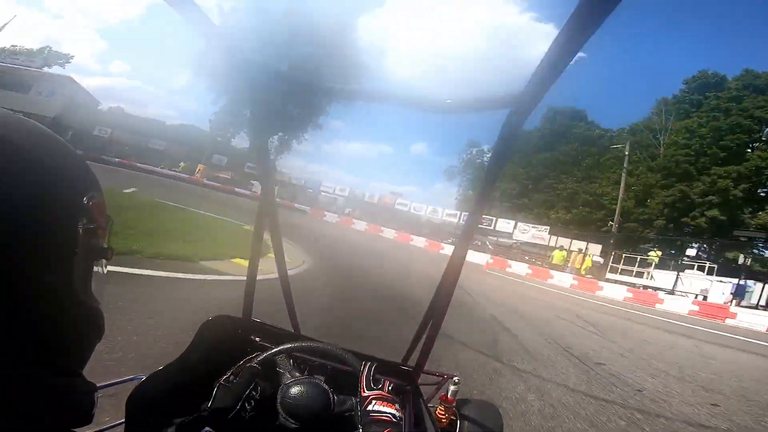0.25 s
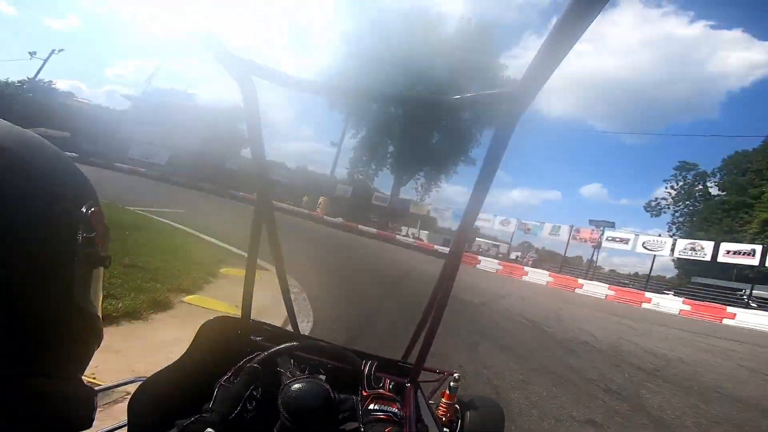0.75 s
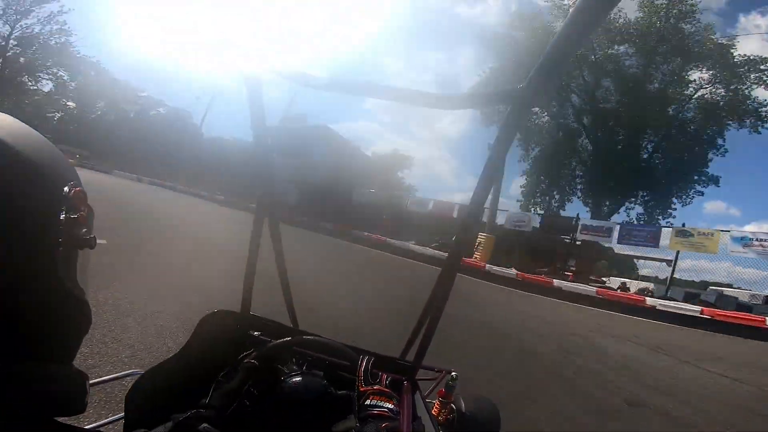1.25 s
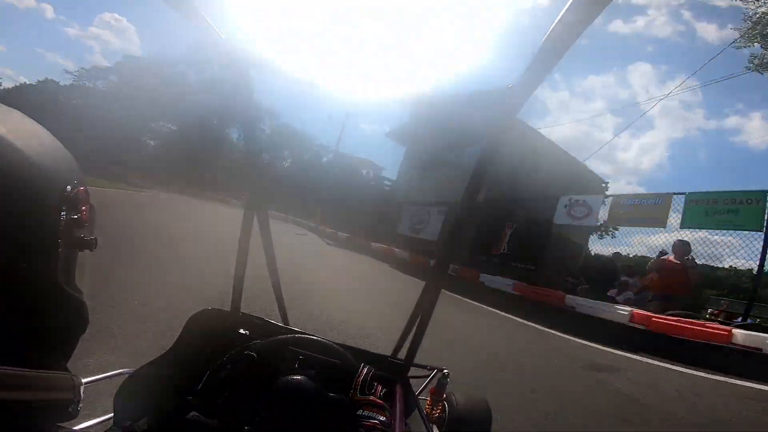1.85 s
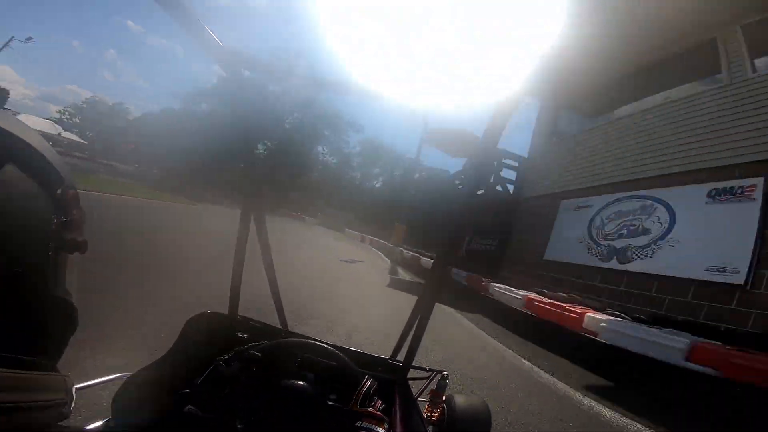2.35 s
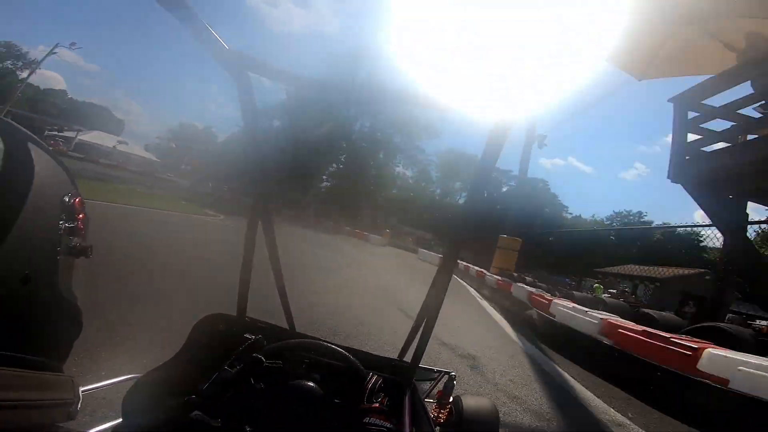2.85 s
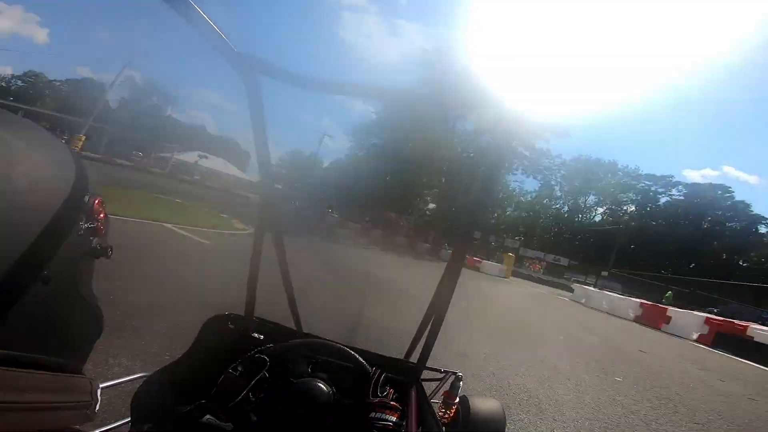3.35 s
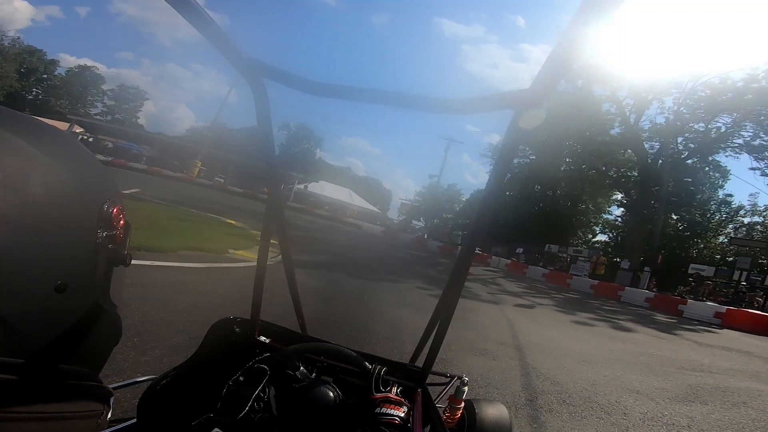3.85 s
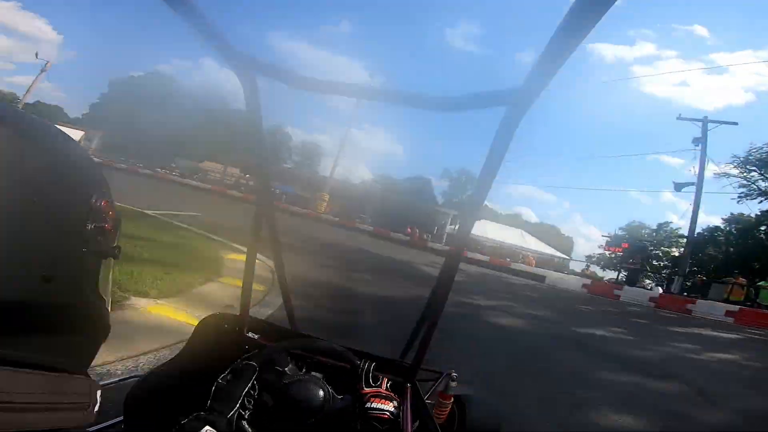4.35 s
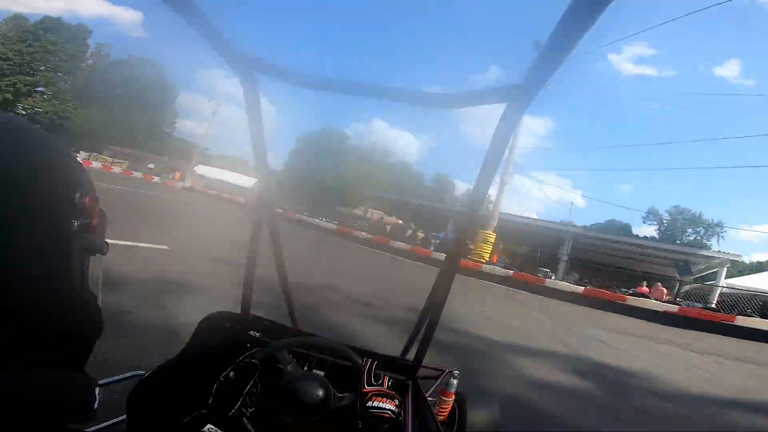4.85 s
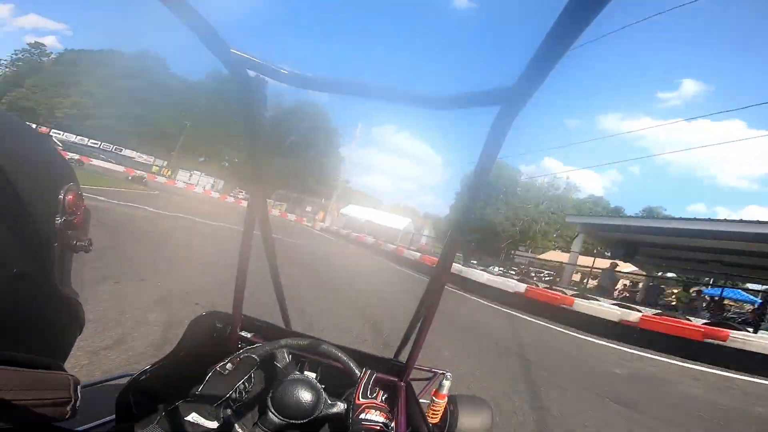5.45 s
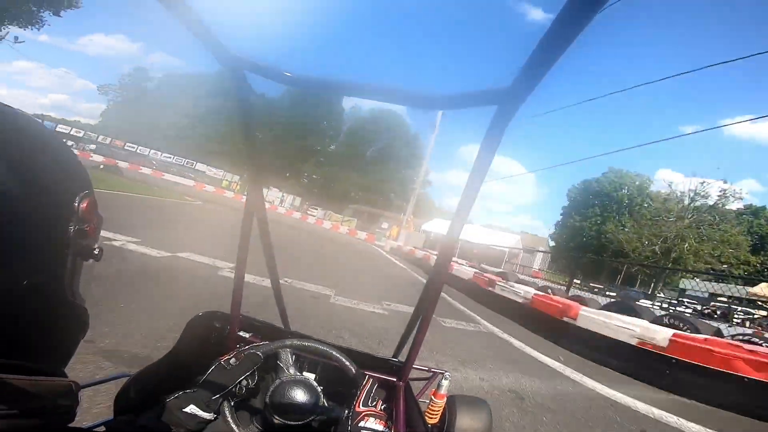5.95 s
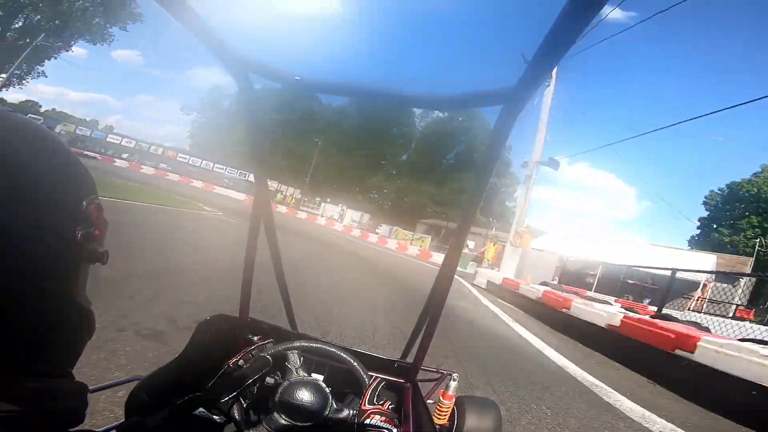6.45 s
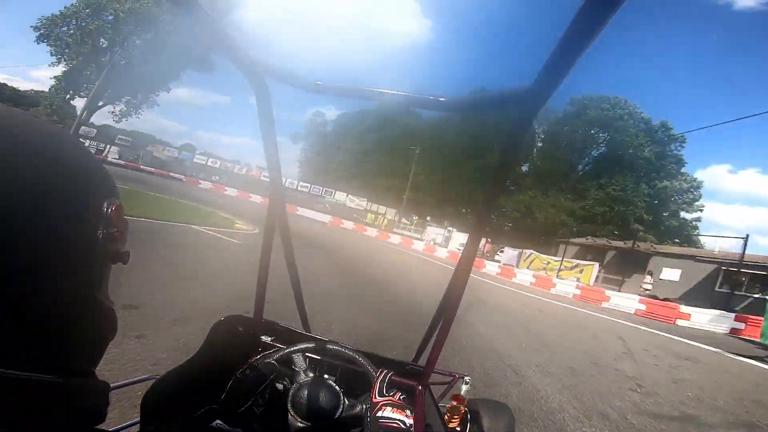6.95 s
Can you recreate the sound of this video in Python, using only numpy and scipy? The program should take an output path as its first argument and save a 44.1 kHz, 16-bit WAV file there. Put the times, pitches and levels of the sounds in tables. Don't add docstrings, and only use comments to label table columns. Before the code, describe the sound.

Loud, close, unbroken roar of a little four-stroke racing engine at full throttle, rapid metallic knocking, buzzing panels and low road and wind rumble.

```python
import sys
import numpy as np
from scipy import signal
from scipy.fft import rfft, irfft
from scipy.io import wavfile

SR = 44100
rng = np.random.default_rng(int(sys.argv[2]) if len(sys.argv) > 2 else 0)


def log_audio(samples):
    frames = np.atleast_2d(samples).T
    limited = np.clip(frames, -1, 1)
    pcm = np.round(limited * 32767).astype(np.int16)
    wavfile.write(sys.argv[1], SR, pcm)


def voltage_ratio(decibels):
    exponent = np.asarray(decibels, float) / 20
    return 10 ** exponent


N = 317961
T = np.arange(N) / SR
USUAL_HZ = 38.8


def evened(x):
    return x / np.sqrt(np.mean(x ** 2) + 1e-20)


def drift(rate_hz):
    lowpass = signal.butter(4, rate_hz, fs=SR, output="sos")
    return evened(signal.sosfilt(lowpass, rng.standard_normal(N)))


def resonate(x, hz, width_hz):
    pole = np.exp((2j * np.pi * hz - np.pi * width_hz) / SR)
    for _ in range(2):
        x = 2 * signal.lfilter([1 - abs(pole)], [1, -pole], x).real
    return x


def add(mix, start_s, sound):
    part = mix[max(round(start_s * SR), 0):][:len(sound)]
    part += sound[:len(part)]


# time_s, cycles_hz
SPEED_CURVE = [(0.0, 39.139), (0.48, 39.308), (0.96, 39.385), (1.44, 38.783), (1.92, 38.101), (2.4, 38.178),
               (2.88, 38.494), (3.36, 38.948), (3.85, 39.438), (4.33, 39.713), (4.81, 39.015),
               (5.29, 38.363), (5.77, 38.201), (6.25, 38.365), (6.73, 38.62), (7.21, 38.916)]


def engine_hz():
    time_s, cycles_hz = np.transpose(SPEED_CURVE)
    return np.interp(T, time_s, cycles_hz)


# order (x cycle rate), level_db, speed_db_per_hz, kerb_db_per_shake
STRONG_ORDERS = [(2, -14.5, -.9, -0.36), (3, -26, 0.3, 0.3), (4, -21.5, 1, 0), (7, -26, -1.5, 0.6)]
# sway_db, lag_rad (as it fails), lead_rad (just before)
WEAK_FIRING_SWAY = [
    (-1.3, 0.56, 0.14),
    (-4, 0.34, .25),
    (3.5, 0.34, 0.18),
    (4, -0.02, 0.17),
]
# order (x cycle rate), level_db
FAINT_ORDERS = [(5, -38.5), (8, -48.5), (9, -42.5), (11, -41)]


def hum(cycles):
    shake_place, shake_skew_rad = .28, 1.92
    firing_place, firing_skew_rad = .079, -.68
    fast_hz, shake = engine_hz() - USUAL_HZ, kerbs(column=2)
    orders = []
    for (order, level_db, speed_db, kerb_db), sway in zip(STRONG_ORDERS, WEAK_FIRING_SWAY):
        orders.append((round(order), level_db + speed_db * fast_hz + kerb_db * shake, *sway))
    orders += [(order, level_db, 0, 0, 0) for order, level_db in FAINT_ORDERS]
    late_cycles = .005 * drift(9)
    lost, early = stumble(.007), stumble(-.035)
    out = np.zeros(N)
    for order, level_db, sway_db, lag_rad, lead_rad in orders:
        place, skew_rad = (firing_place, firing_skew_rad) if order % 2 else (shake_place, shake_skew_rad)
        upper = order > 2
        waver_db = 0.72 * drift(2.33) * upper + (0.7 + 0.47 * upper) * drift(14.7)
        height = voltage_ratio(level_db + sway_db * lost + waver_db)
        sway_rad = -lag_rad * lost + lead_rad * early + 0.11 * drift(11)
        phase = 2 * np.pi * order * (cycles - place + late_cycles) + skew_rad + sway_rad
        out += np.sqrt(2) * height * np.cos(phase)
    return out


# first_s, count (in a row), level_db (re full knock)
FAILED_KNOCKS = [(.218, 1, -11), (.371, 1, -26), (.524, 1, -28), (.677, 2, -17), (.829, 1, -24),
                 (.982, 2, -8), (1.16, 2, -11), (1.237, 1, -4), (1.313, 1, -23), (1.52, 2, -6),
                 (1.702, 1, -5), (1.858, 1, -44), (2.408, 1, -16), (2.774, 1, -28), (2.904, 1, -46),
                 (3.394, 1, -25), (3.675, 4, -17), (3.853, 2, -19), (4.182, 3, -14), (4.308, 1, -5),
                 (4.384, 1, -25), (4.561, 1, -37), (4.715, 2, -16), (4.868, 1, -6), (5.412, 1, -11),
                 (5.595, 1, -29), (6.091, 1, -5), (6.378, 1, -6), (6.534, 1, -7), (7.103, 1, -1)]
# first_s, count (in a row), level_db (re full knock)
STRONG_REBOUNDS = [(0.053, 1, -2), (0.231, 1, -12), (0.384, 1, -3), (0.74, 1, 1), (1.096, 1, -4),
                   (1.249, 2, 0.5), (1.352, 1, -8), (1.61, 1, -3), (2.107, 1, -5), (2.448, 1, 1),
                   (2.552, 1, -6), (3.201, 1, 0.5), (3.433, 1, -0.5), (3.612, 1, -1), (3.764, 1, 2.5),
                   (4.144, 1, -2), (4.447, 1, 0.5), (4.574, 1, -4.5), (4.65, 2, -3), (4.778, 2, 0),
                   (4.88, 1, -4.0), (5.061, 1, 0.5), (5.503, 1, -3), (5.555, 1, -9), (5.974, 1, 2.5),
                   (6.104, 1, -10), (6.287, 1, -10), (6.417, 1, -2), (7.038, 1, -0.5), (7.141, 1, -3.5)]


def knock_list(cycles):
    soft_db = 1.1
    faint_db, faint_spread_db, chain_db = -18, 5, 5
    chain_cycles, chain_place = 6.54, .447
    turn = np.arange(1, cycles[-1], .5)
    at_s, luck = np.interp(turn, cycles, T), rng.standard_normal(len(turn))
    chain_swell = np.cos(2 * np.pi * (turn / chain_cycles - chain_place))
    rebound_db = np.minimum(faint_db + faint_spread_db * luck + chain_db * chain_swell, -7)
    knock_db = .6 - soft_db * luck ** 2 / (1 + 0.088 * luck ** 2)
    level_db = np.where(turn % 1, rebound_db, knock_db)
    for first_s, count, odd_db in list(FAILED_KNOCKS) + list(STRONG_REBOUNDS):
        level_db[np.argmin(abs(at_s - first_s))::2][:round(count)] = odd_db
    return list(zip(at_s, level_db))


def stumble(after_s):
    lost = np.zeros(N)
    for first_s, count, level_db in FAILED_KNOCKS:
        share = np.clip(1 - voltage_ratio(level_db), 0, 1) * np.hanning(round(.07 * SR))
        for start_s in first_s + np.arange(round(count)) / USUAL_HZ:
            add(lost, start_s + after_s - .035, share)
    return lost - lost.mean()


# mode_hz, width_hz, level_db
DRIVE_MODES = [(602, 355, 4), (997, 193, -6.5), (1485, 530, -0.5), (1910, 376, -3.8), (2697, 350, -14.5),
               (3400, 250, -13.5)]


def knocks(cycles):
    lead_s, contact_s, scatter_s, detune = .0012, .00097, .0003, .02
    blows = knock_list(cycles)
    luck = rng.standard_normal((len(blows), 2 + 2 * len(DRIVE_MODES)))
    t = np.arange(400) / SR
    thud, clatter = np.zeros(N), np.zeros(N)
    for (blow_s, blow_db), row in zip(blows, luck):
        start_s = blow_s - lead_s + scatter_s * row[0]
        size = voltage_ratio(blow_db + .7 * row[1])
        ring = np.zeros(len(t))
        for k, (mode_hz, width_hz, level_db) in enumerate(DRIVE_MODES):
            swell = np.pi * width_hz * t * np.exp(1 - np.pi * width_hz * t)
            own_hz = mode_hz * (1 + detune * row[-1 - k])
            ring -= voltage_ratio(level_db + row[2 + k]) * swell * np.cos(2 * np.pi * own_hz * (t - contact_s))
        add(thud, start_s, size * ring)
        burst = 0.51 * t / 0.00095 * np.exp(1 - t / 0.00086)
        add(clatter, start_s, np.sqrt(size) * burst * rng.standard_normal(len(t)))
        add(clatter, start_s + 0.00043, size * np.array([4.2]))
    jolts(thud, clatter)
    return voltage_ratio(-16.5) * thud, clatter


# start_s, level_db (re full knock)
BUMP_JOLTS = [
    (3.712, -4),
    (3.752, 6),
    (3.761, 7),
    (3.776, 7),
    (4.209, 8),
    (5.421, -5),
]


def jolts(thud, clatter):
    t = np.arange(400) / SR
    decay = np.exp(-t / .0006)
    for start_s, level_db in BUMP_JOLTS:
        add(clatter, start_s, voltage_ratio(level_db) * decay * rng.standard_normal(len(t)))
        add(thud, start_s, voltage_ratio(level_db - 28) * decay * rng.standard_normal(len(t)))


# mode_hz, width_hz, chatter_db, clatter_db (of a knock)
FRAME_MODES = [(1034, 236, -3, -55), (1332, 148, 1.5, -16), (1542, 206, 2.5, -20), (2021, 567, -2.5, -27),
               (2872, 125, -9.5, -30), (3195, 390, -10, -24.5), (3907, 560, -20.5, -33.5),
               (4990, 1100, -20, -32), (6620, 700, -29, -31), (7620, 1130, -29.5, -35),
               (10200, 1550, -30, -39), (13400, 1700, -47, -58)]


def rattle(cycles, clatter):
    rattle_db, rattle_db_per_hz, treble_db, clumps_db = -25.5, -1.3, -0.65, .9
    load = np.cos(4 * np.pi * (cycles - .93)) - 1.7 * np.sin(2 * np.pi * cycles)
    rough_db = kerbs(column=3)
    usual_db = rattle_db + rattle_db_per_hz * (engine_hz() - USUAL_HZ) + rough_db
    chance_db = clumps_db * drift(28.4) + 0.96 * drift(440)
    clumps = voltage_ratio(usual_db + .5 * load + 4.9 * stumble(0.017) + chance_db)
    ticks = voltage_ratio(3.5 * np.minimum(rng.exponential(1, N), 4)) * (rng.random(N) < 900 / SR)
    ticks = evened(ticks * rng.choice([-1, 1], N))
    hiss = rng.standard_normal(N)
    low = clumps * (0.97 * hiss + 0.5 * ticks)
    bright_db = treble_db - 0.15 * rough_db + valves(cycles)
    bright_db = bright_db + 0.37 * stumble(0.053) + .2 * load + 1.26 * drift(130)
    bright = clumps * voltage_ratio(bright_db)
    out, buzz = np.zeros(N), drift(10.8)
    for k, (mode_hz, width_hz, chatter_db, clatter_db) in enumerate(FRAME_MODES):
        own_ticks = np.roll(ticks, 997 * k)
        high = bright * (0.64 * hiss + 0.42 * ticks + 0.28 * own_ticks)
        swell_db = np.roll(buzz, 20011 * k)
        chatter = voltage_ratio(chatter_db + 12.5 + 1.06 * swell_db) * (high if mode_hz > 2500 else low)
        drive = chatter + voltage_ratio(clatter_db + 10.5) * clatter
        out += (-1) ** k * resonate(drive, mode_hz, width_hz)
    return out


# place (in cycle 0-1), length_cycles, level_db
VALVE_STIRS = [
    (.2, 0.06, 5.5),
    (.36, 0.024, 1.5),
    (.57, .09, 3),
    (.875, 0.062, 3),
]


def valves(cycles):
    place_now = cycles % 1
    return sum(level_db * np.exp(-((place_now - place) / length_cycles) ** 2)
               for place, length_cycles, level_db in VALVE_STIRS)


# middle_s, length_s, shake, chatter_db
ROUGH_PATCHES = [(0.016, 0.062, 8.4, 6), (0.702, 0.14, 1.5, -0.1), (0.958, 0.3, 1.5, 0),
                 (1.654, 0.16, 4.5, 4), (2.42, 0.25, 1.5, 1.5), (3.762, .3, 0.4, -2.2),
                 (4.2, 0.42, 1.8, 1.5), (4.31, .08, 6, 2.5), (4.847, 0.14, 0.96, -1.5),
                 (5.232, 0.18, 1.2, 1.5), (5.924, 0.19, 0.26, 2), (6.708, .13, 4.5, 5.5)]


def kerbs(column):
    return sum(row[column] * np.exp(-(2 * (T - row[0]) / row[1]) ** 2) for row in ROUGH_PATCHES)


# freq_hz, level_db (per Hz)
ROAD_WIND = [(15, -22), (35, -10.5), (52, -10), (98, -8.5), (330, -8.5), (400, -20.5), (800, -18.5),
             (1500, -34)]


def rumble():
    road_db, road_db_per_hz, lumps_db = -28.5, 0.3, 1.6
    hz = np.fft.rfftfreq(N, 1 / SR)
    freq_hz, level_db = np.transpose(ROAD_WIND)
    shape = voltage_ratio(np.interp(np.log(hz + 1), np.log(freq_hz), level_db, right=-120))
    noise = evened(irfft(rfft(rng.standard_normal(N)) * shape, N))
    swell_db = road_db + road_db_per_hz * (engine_hz() - USUAL_HZ) + 0.87 * kerbs(column=2)
    return noise * voltage_ratio(swell_db + lumps_db * drift(10.4) + 2.5 * stumble(0.031))


def scene():
    cycles = .443 + np.cumsum(engine_hz()) / SR
    thud, clatter = knocks(cycles)
    return (hum(cycles) + thud + rattle(cycles, clatter) + rumble())[None]


def top_cut(x):
    return signal.sosfilt(signal.butter(12, 15430, fs=SR, output="sos"), x)


def record(dry):
    lowpass = signal.butter(20, 14600, fs=SR, output="sos")
    edge = signal.sosfilt(lowpass, dry) + 0.017 * dry
    mix = 1.74 * np.tanh(edge / 1.641) + .0026
    return top_cut(mix)


dry = scene()
out = record(dry)
log_audio(out)
```